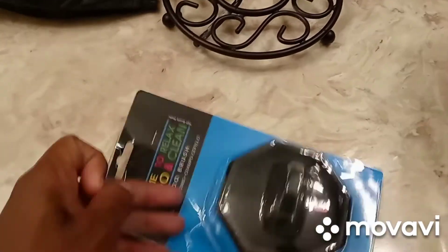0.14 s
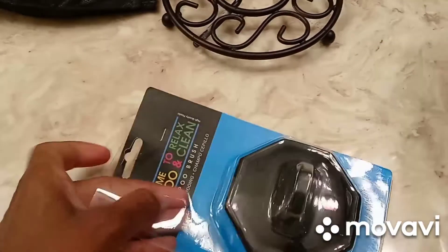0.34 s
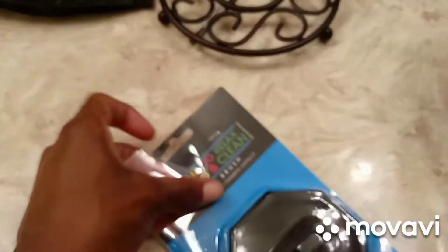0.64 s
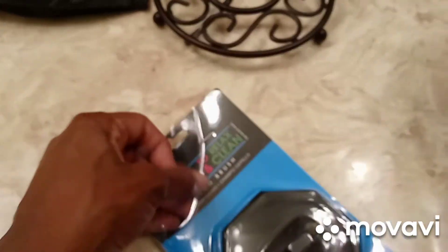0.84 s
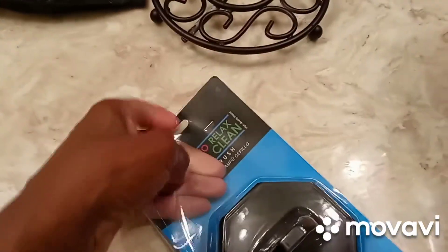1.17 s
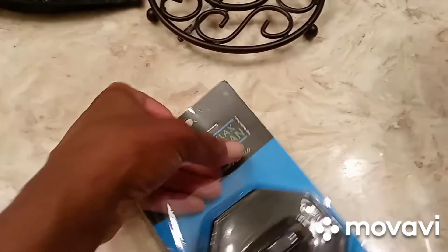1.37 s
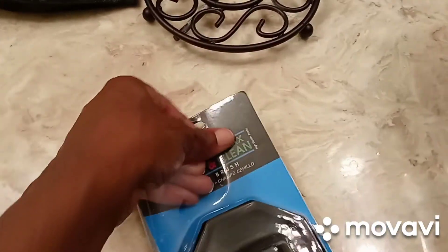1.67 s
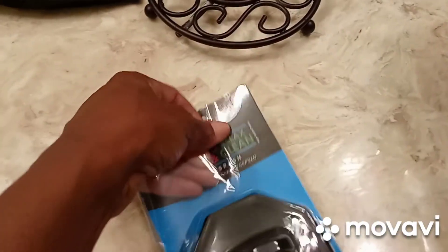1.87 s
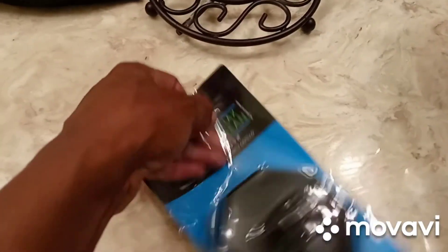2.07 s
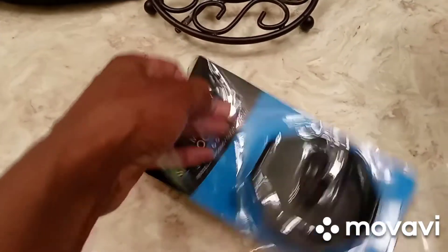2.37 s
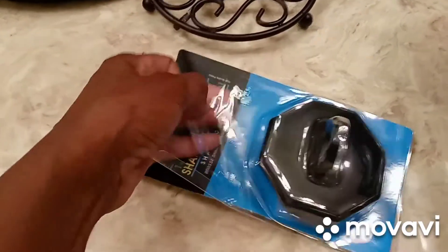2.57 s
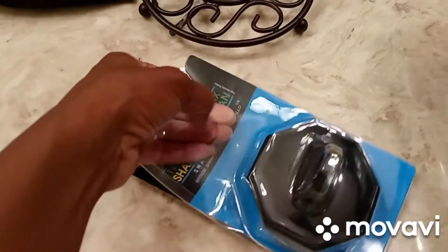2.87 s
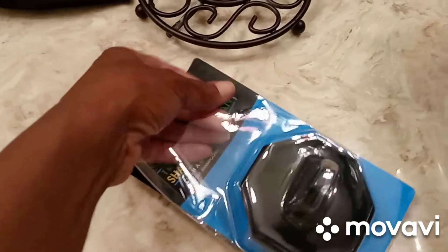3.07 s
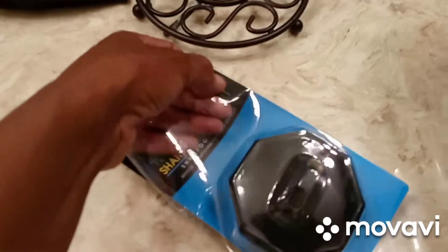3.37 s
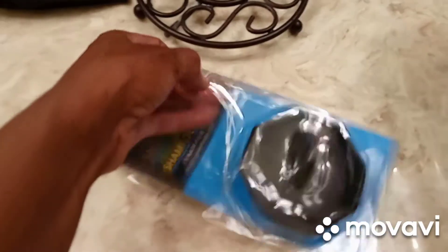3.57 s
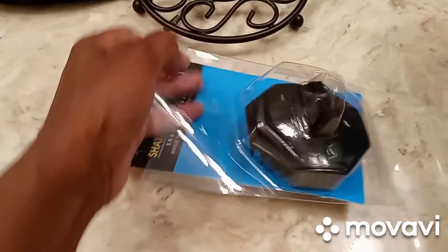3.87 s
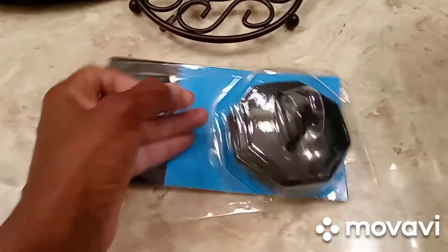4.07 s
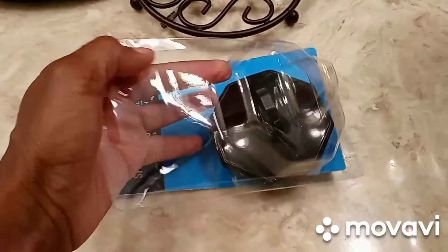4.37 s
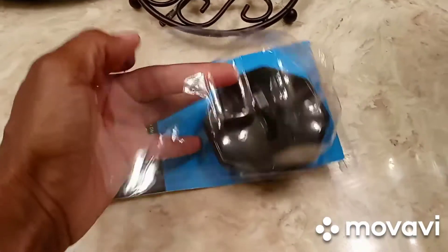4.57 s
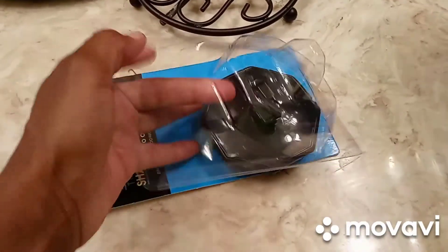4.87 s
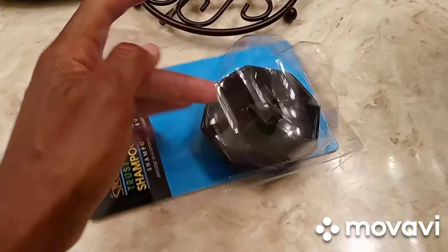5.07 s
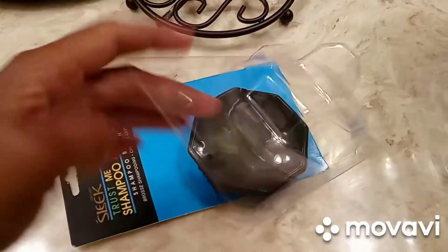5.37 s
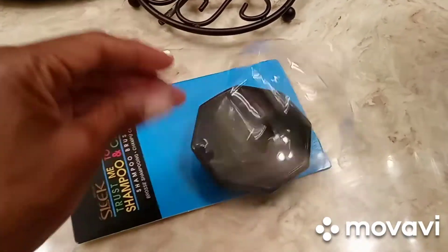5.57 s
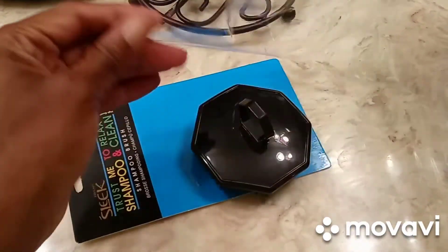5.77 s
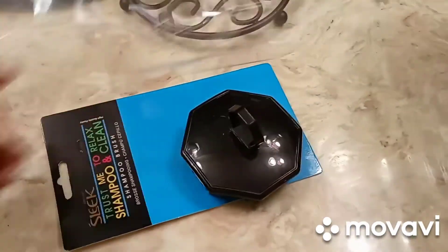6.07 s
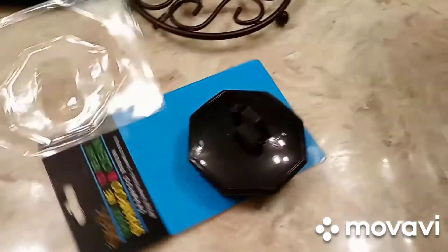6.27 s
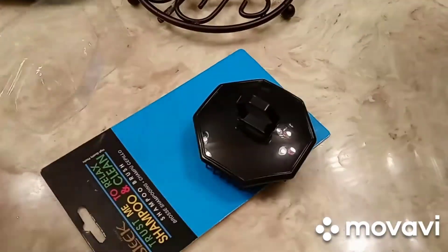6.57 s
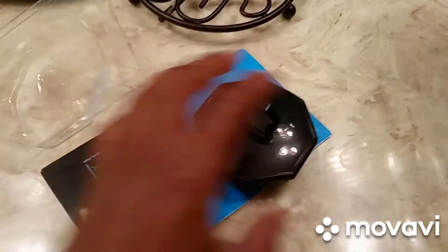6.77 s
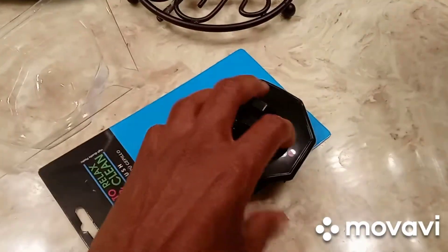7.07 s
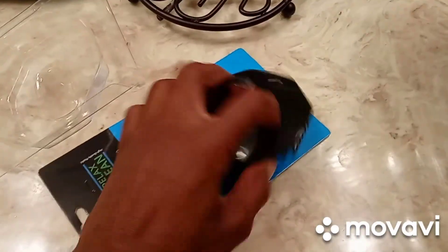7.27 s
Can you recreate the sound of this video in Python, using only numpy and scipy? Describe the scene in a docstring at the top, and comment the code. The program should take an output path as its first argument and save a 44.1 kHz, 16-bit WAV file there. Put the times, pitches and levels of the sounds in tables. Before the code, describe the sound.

From the start, stiff plastic packaging crinkles and snaps close by as a hand pries it from its card backing in a small room. Sharp, uneven cracks and short rubs continue through the first two seconds, with quick runs of ticks as the glued seam gives. At about 2.5 seconds comes the loudest crack, with a dull thump and a brief rip. More snaps follow, and another ticking tear comes at around 3.6 to 3.8 seconds. From 4 seconds the loosened shell crackles with a hollower ring, with a strong snap near 5.5 seconds. The card drops lightly on a stone counter at about 5.8 seconds. The empty shell is set down with light hollow taps near 6.4 seconds, and the card scrapes over the stone in short pushes until about 6.9 seconds. A few faint finger ticks end it just after 7 seconds.

```python
"""A stiff plastic blister is peeled off its card by hand, close by, over a stone counter in a small room.
Creases buckle with a snap, the glue seam fails in runs of ticks, and stick-slip friction sounds the
sheet as it slides and flexes. Once free, the hollow shell rings in its own modes. The card drops on
the counter and scrapes over the stone; the shell is laid aside and fingers touch the packed item."""
import sys
import numpy as np
from scipy import signal
from scipy.fft import rfft, irfft
from scipy.io import wavfile
from scipy.ndimage import uniform_filter1d

SR = 44100
rng = np.random.default_rng(int(sys.argv[2]) if len(sys.argv) > 2 else 0)


def file_out(sig):
    """Save sig as 16-bit WAV at sys.argv[1]."""
    # one column per channel
    cols = np.atleast_2d(sig).T
    # limit, then scale
    lim = np.clip(cols, -1, 1)
    pcm = np.round(lim * 32767).astype(np.int16)
    wavfile.write(sys.argv[1], SR, pcm)


N = 327222
TIME = np.arange(N) / SR

# modes of the hollow shell: pitch_hz, level_db, t60_s
SHELL_MODES = [(308, -28.5, 0.17), (630, -21.5, .3), (857, -6.5, 0.24), (838, -9.5, 0.14),
               (1026, -19.5, .16), (1196, -5, .07), (2360, -10.5, 0.12), (3467, -18.5, .11)]


def undb(db):
    """Decibels to amplitude ratio."""
    return 10 ** (np.asarray(db) / 20)


def unit(x):
    """Normalisation to rms 1."""
    return x / np.sqrt(np.mean(x ** 2))


def unit_energy(x):
    """Normalisation to a sum of squares of 1."""
    return x / np.sqrt(np.sum(x ** 2))


def add(track, s, sound):
    """Superposition: a sound joins the track at time s."""
    start = int(np.clip(s * SR, 0, N - 1))
    track[start:start + len(sound)] += sound[:N - start]


def convolve(x, response):
    """Linear filtering by an impulse response, cut to the length of x."""
    return signal.fftconvolve(x, response)[:len(x)]


def filtered(x, order, hz, kind="bandpass"):
    """Maximally flat filtering with corners at hz."""
    return signal.sosfilt(signal.butter(order, hz, kind, fs=SR, output="sos"), x)


def colour(points, size=1024):
    """Minimum-phase response of a (frequency_hz, level_db) spectrum, by folding its cepstrum."""
    hz, db = np.transpose(points)
    grid = np.maximum(np.fft.rfftfreq(size, 1 / SR), 1)
    magnitude = undb(np.interp(np.log(grid), np.log(hz), db))
    cepstrum = irfft(np.log(magnitude))
    cepstrum[1:size // 2] *= 2
    cepstrum[size // 2 + 1:] = 0
    return irfft(np.exp(rfft(cepstrum)))


def ring(modes):
    """Free vibration: damped modes of a struck object, with the bass below its lowest mode cut away."""
    t = TIME[:SR // 2]
    sound = sum(undb(db) * np.sin(2 * np.pi * hz * t) * np.exp(-np.log(1000) * t / t60)
                for hz, db, t60 in modes)
    return filtered(sound, 3, modes[0][0] * .8, "highpass")


def stick_slip(rate_hz, spread_db, smooth):
    """Stick-slip friction: random impulses of very unequal size over a share of smooth noise."""
    sizes = undb(spread_db * np.minimum(rng.exponential(size=N), 4))
    slips = (rng.random(N) < rate_hz / SR) * sizes * rng.choice([-1, 1], N)
    return unit(unit(slips) + smooth * rng.standard_normal(N))


def swell(start, end, skew=0.71):
    """Amplitude envelope of a hand stroke, building faster than it fades."""
    progress = np.linspace(0, 1, int(max(end - start, .01) * SR))
    return np.abs(np.sin(np.pi * progress ** skew)) ** 0.68


def freedom(s):
    """Coupling to the shell's modes at time s, 0-1: the freer it hangs, the more it rings."""
    # share of body-band energy that enters the ring: time_s, share
    ring_share = [(0, 0.01), (3.9, 0.02), (4.25, 0.2), (4.65, 0.33), (5.45, 0.75), (5.72, 0.4), (5.8, 0.93),
                  (6.35, 0.35), (7.4, 0)]
    return np.clip(np.interp(s, *np.transpose(ring_share)), 0, 1)


def sheet_bands():
    """Impulse response of the thin sheet in five bands: bass, body, presence, treble and air."""
    # the sheet's radiation spectrum: frequency_hz, level_db
    radiation = [(190, -14.5), (320, -9.5), (500, -7), (760, 6), (1100, 7.5), (1700, 1.5), (2200, 8.5),
                 (2800, 13.5), (3500, 10), (4500, 1), (6100, -10.5), (6900, -5.5), (8500, -4),
                 (12000, -5.5), (16000, -15.5)]
    # limits of the bands: edge_hz
    edges = [200, 600, 1800, 5000, 9500, 16000]
    tick = colour(radiation)
    return [unit_energy(filtered(tick, 3, band_hz)) for band_hz in zip(edges, edges[1:])]


def slides(bands, bass_db=-12):
    """Dense stick-slip drives the sheet as it rubs or tears along card and skin."""
    # strokes: start_s, end_s, presence_db, then relative to it body_db, treble_db, air_db
    strokes = [(0, 0.087, -30, -0.5, -6, -10), (0.137, 0.232, -33.5, -4.5, -5, -4),
               (0.54, 0.67, -42, 0.5, -3, 0.5), (.831, 0.897, -35, -14, -3.5, -1),
               (1.025, 1.055, -45, 0, 3, 3), (1.075, 1.11, -43, 0, -16.5, -15.5),
               (1.163, 1.187, -32, -5, -3, 5), (1.282, 1.33, -37.5, -20, 0, 3),
               (1.56, 1.592, -31, -7, -1.5, -2.5), (2.232, 2.323, -30, 0.5, 2.5, -17),
               (2.521, 2.648, -19.5, -4, -7, -16), (2.822, 2.934, -33.5, -1, -5, -3.5),
               (3.154, 3.297, -45.5, -9, -5, -6), (3.503, 3.727, -38, -2.5, -10, -14),
               (3.721, 3.857, -20.5, -2.5, -7, -12), (4.208, 4.244, -37.5, -6.5, -6, -3.5),
               (4.314, 4.365, -30, -2, -2, -4.5), (4.739, 4.81, -33.5, -8, -3, 3.5),
               (4.906, 5.007, -35, -7, -3, -10), (5.129, 5.201, -42, -18.5, -7, -8),
               (5.367, 5.447, -36.5, -8, -8, -5.5), (6.012, 6.256, -60, -34, 0, -1)]
    out, friction = np.zeros(N), stick_slip(rate_hz=1800, spread_db=3.2, smooth=.45)
    voices = [convolve(friction, band) for band in bands]
    for start, end, db, body_db, treble_db, air_db in strokes:
        first, stroke = int(max(start, 0) * SR), swell(start, end)
        gains = undb(db + np.array([body_db + bass_db, body_db, 0, treble_db, air_db]))
        rub = sum(gain * unit(voice[first:first + len(stroke)]) for gain, voice in zip(gains, voices))
        add(out, start, stroke * rub)
    return out


def settling(snapping, level_db=-19.5, lag_s=0.017, decay_s=0.016):
    """Relaxation: the envelope of the crinkle that follows every snap."""
    t = TIME[:SR // 2]
    fade = (1 - np.exp(-t / lag_s)) ** 2 * np.exp(-t / decay_s)
    return undb(level_db) * np.sqrt(np.abs(convolve(snapping ** 2, fade / fade.sum())))


def flexing(bands, snapping):
    """Sparse slips creak in the bent sheet, dense ones hiss under the skin; both revive after a snap."""
    # course of the flexing: time_s, crinkle_db, hiss_db
    flex_levels = [(0, -24, -43), (.25, -45.5, -45), (.5, -46, -55.5), (.82, -56.5, -63), (1.1, -37.5, -43),
                   (1.5, -54, -59), (1.64, -38.5, -49), (1.8, -58, -44.5), (1.9, -39, -56),
                   (2.35, -52, -58.5), (3.33, -54, -54), (3.47, -41.5, -48.5), (4.4, -52.5, -51),
                   (4.6, -56, -62.5), (5.6, -69.5, -55.5), (5.97, -88.5, -73), (6.33, -77.5, -71),
                   (6.6, -45, -54), (6.9, -53.5, -54.5), (7.05, -83, -73.5)]
    s, *columns = np.transpose(flex_levels)
    crinkle, hiss = (undb(np.interp(TIME, s, column)) for column in columns)
    after = settling(snapping)
    creak = stick_slip(rate_hz=200, spread_db=3.2, smooth=.25)
    brush = unit(stick_slip(rate_hz=2500, spread_db=3, smooth=1) + .6 * creak)
    bass, body, presence, treble, air = bands
    low = convolve(creak, undb(-15) * bass + undb(-4) * body + undb(-0.5) * presence)
    high = convolve(brush, undb(-3) * (treble + air))
    return np.hypot(crinkle, after) * low + np.hypot(hiss, undb(-5) * after) * high


def hand(motion, gain_db=-44, rumble_hz=125, follow=0.52):
    """Forced vibration: each tug shakes hand and card with a rumble, less while the shell hangs free."""
    effort = np.sqrt(np.abs(uniform_filter1d(motion ** 2, size=2205, origin=1100)))  # rms over 50 ms
    held = 1 - freedom(TIME)
    rumble = filtered(rng.standard_normal(N), 3, [rumble_hz / 1.6, rumble_hz * 1.5])
    return undb(gain_db) * held * effort ** follow * unit(rumble)


def room(x, early_db=-8, early_decay_s=0.011, late_db=-5, low_t60_s=0.33, high_t60_s=0.35):
    """Early reflections off the counter and a diffuse tail; their pattern shifts as the package moves."""
    # spectrum of the reflections: frequency_hz, level_db
    reflectance = [(50, -17.5), (150, -4), (300, 8), (850, 0), (1700, -2), (2800, -1.5), (6000, -6.5),
                   (9000, -4), (16000, -18.5)]
    t, walls, hop = TIME[:SR * 2 // 5], colour(reflectance), SR // 10
    low_fade, high_fade = (np.exp(-np.log(1000) * t / t60) for t60 in (low_t60_s, high_t60_s))
    out, window = np.zeros(N), signal.get_window("hann", 2 * hop)
    for start in range(0, N, hop):  # a fresh random pattern for each overlapping piece
        near, far = rng.standard_normal((2, len(t))) * (t > .0025)
        early = near * np.exp(-t / early_decay_s)
        late = filtered(far, 2, 4500, "lowpass") * low_fade
        late -= filtered(far, 2, 4500, "highpass") * high_fade
        echoes = undb(early_db) * unit_energy(early) + undb(late_db) * unit_energy(late)
        piece = x[start:start + 2 * hop]
        faded = piece * np.sqrt(window[:len(piece)])
        add(out, start / SR, signal.fftconvolve(faded, convolve(echoes, walls)))
    return out


def room_tone(level_db=-72):
    """Stationary background noise: a faint rumble and hiss."""
    # relative spectral density: frequency_hz, density_db
    spectrum = [(25, -15), (60, -6), (120, 3.5), (250, -8.5), (600, -21.5), (900, -14.5), (1500, -19.5),
                (3000, -17.5), (6000, -23.5), (11000, -10), (16000, -15)]
    return undb(level_db) * unit(convolve(rng.standard_normal(N), colour(spectrum, size=4096)))


def buckle(t, decay, crease_hz=2750, crease_t60_s=.005, focus_s=0.001, rise_s=0.0001, grit_db=4.5):
    """Buckling force: a short snap is one crease flipping at its own pitch, a long one a flutter."""
    flutter, grit = rng.standard_normal((2, len(t)))
    onset = 1 - np.exp(-t / rise_s)
    ragged = flutter * undb(grit_db * grit) * onset * np.exp(-t / max(decay, 1 / SR))
    pitch = crease_hz * np.exp(.07 * np.clip(grit[-1], -2, 2))
    crease = np.sin(2 * np.pi * pitch * t) * onset * np.exp(-np.log(1000) * t / crease_t60_s)
    crease_share = .75 * np.exp(-decay / focus_s)
    return np.sqrt(crease_share) * unit_energy(crease) + np.sqrt(1 - crease_share) * unit_energy(ragged)


def band_gains(s, decay, db, body_db, treble_db, push_s=0.0019, air_db_per_db=-0.2278, even_db=-27):
    """Spectral balance of a snap: a brief push or a free shell radiates little bass."""
    brevity_db = 10 * np.log10(1 + (push_s / decay) ** 4)
    bass_db = body_db - 4 - 20 * np.sqrt(freedom(s)) - brevity_db
    # stronger releases move a larger patch of sheet and have less air
    air_db = treble_db + air_db_per_db * (db - even_db)
    return undb(db + np.array([bass_db, body_db, 0, treble_db, air_db]))


def snaps(bands, glue):
    """Impulsive excitation of sheet and shell: the direct sound, and the spread that feeds the room."""
    # creases buckle and edges tap: time_s, decay_s, presence_db (energy packed into 1 ms),
    # then relative to it body_db, treble_db
    creases = [(.0485, .0013, -23, 5.5, -9), (.096, .0011, -15, -4.5, -16), (.1024, .0013, -18, -20, -15),
               (.1661, 0.0031, -11, -3, -13), (.2589, 0.0041, -16.5, 2.5, 1),
               (.3421, 0.0047, -7.5, -2, -14), (.3544, .0015, -11, -19, -4.5),
               (.4538, 0.0016, -30.5, 8.5, 15), (.6292, 0.0049, -16, 3, -21),
               (.6363, 0.0065, -4.5, -0.5, -8), (1.0018, 0.0058, -23.5, -2.5, -9),
               (1.0745, .005, -20.5, 1.5, -16), (1.1747, 0.0033, -18.5, -3, 0),
               (1.2144, .0066, -21, 1, -13), (1.2856, 0.0019, -23.5, -18, -9),
               (1.3354, 0.0013, -2, -6, -6.5), (1.4498, 0.0029, -17, -13, -6),
               (1.5512, 0.011, -22.5, -42, -7), (1.6012, .001, -24, -1, -8), (1.7002, .0005, -4, -10, -7.5),
               (1.7767, 0.0024, -16, -3.5, -19), (2.0484, 0.0018, -19, -7, -13),
               (2.1206, 0.0072, -18, -2.5, -3), (2.1279, 0.0023, -7.5, -9.5, -6),
               (2.2264, .0014, -2.5, -11, -6.5), (2.234, 0.002, -13, -8, -4),
               (2.278, 0.00095, -6.5, -6, -24), (2.3277, .0013, -17.5, -4.5, -14),
               (2.3591, .002, -19.5, -0.5, -21), (2.3809, 0.0013, -14.5, -7.5, -17),
               (2.4021, .0017, -22, -6.5, -17.5), (2.4509, .009, -24, -1.5, -15.5),
               (2.4658, .0017, -22, -1, -15.5), (2.4821, .0016, -26, -10.5, -24.5),
               (2.5036, 0.0075, -4, 2.5, 0), (2.5075, 0.0052, 2.5, -29, -12),
               (2.514, 0.0067, -0.5, -8.5, -15), (2.7483, .0046, -14, .5, -5),
               (2.8107, 0.0043, -5.5, -8, -4.5), (2.8923, 0.006, -13, -11, -2.5),
               (2.901, .004, -9.5, -2.5, -5.5), (2.9371, 0.0021, -11, -7, -7.5),
               (3.0604, 0.0029, -11.5, -5, -4), (3.183, .005, -26, -6.5, -8), (3.4834, .001, -22, -7, -13),
               (3.5032, 0.0027, -7.5, -3.5, -29), (3.7141, 0.0044, -1.5, -11, -11.5),
               (3.7398, 0.0063, -12, 1.5, 1), (3.859, 0.0048, -14.5, -6, -3),
               (3.9639, 0.0074, -20.5, 1.5, -9), (4.0158, .006, -24.5, -2, -8),
               (4.085, 0.0073, -25.5, -3, -3), (4.1212, 0.0094, -21.5, -2.5, -9),
               (4.2521, .005, -8, 3, -10), (4.3336, 0.0099, -12.5, -2.5, -12), (4.4074, 0.006, -9, -8, -5),
               (4.5605, .012, -26.5, -2.5, -13.5), (4.634, .01, -39.5, 4.5, -11),
               (4.685, 0.0047, -19, -10, -10.5), (4.7397, 0.016, -13.5, 3.5, -9),
               (4.7453, .007, -11.5, 2, -0.5), (4.866, .0014, -31.5, -1, -2),
               (5.0318, 0.0028, -28.5, -5.5, 4), (5.2781, 0.004, -30, -12, 2.5),
               (5.3115, 0.0019, -21, -8, -4), (5.4139, 0.0093, -13, -7.5, -9),
               (5.4618, .0085, -3.5, -3.5, -1), (5.469, .012, -15.5, 12, -22),
               (5.4995, 0.002, -18.5, -17, 0), (5.7025, 0.0042, -24, -2.5, -6),
               (5.7419, 0.0039, -14, -3.5, 2), (6.0869, .0007, -52.5, -22, 15.5),
               (6.3528, 0.0036, -26.5, 2, -13), (6.3685, 0.0039, -32.5, 13.5, -6),
               (6.4105, .009, -30, 10, -7), (6.5151, 0.0014, -24.5, -20, -1),
               (6.5652, .005, -28.5, -16, -2), (6.5894, 0.0048, -20, -25, -0.5),
               (6.7803, 0.0056, -25, -12, -1.5), (6.8384, 0.0096, -23.5, -13, -3),
               (6.8983, 0.0095, -26.5, -9.5, -8.5), (7.089, .007, -48, -15, -6.5),
               (7.181, 0.0034, -51, -16.5, -3), (7.345, .005, -60.5, -15, 2)]
    direct, spread, t = np.zeros(N), np.zeros(N), TIME[:SR // 12]
    hollow = unit_energy(ring(SHELL_MODES))
    for s, decay, db, body_db, treble_db in creases + glue:
        force = buckle(t, decay)
        gains = band_gains(s, decay, db, body_db, treble_db) * np.sqrt(SR / 1000)
        # the freed shell takes over part of the body band and rings with it
        free = freedom(s)
        for track in (direct, spread):
            add(track, s, gains[1] * np.sqrt(free) * hollow)
        gains[1] *= np.sqrt(1 - free)
        crack = sum(gain * unit_energy(convolve(force, band)) for gain, band in zip(gains, bands))
        add(direct, s, crack)
        # over all directions the notches of the flutter partly average out
        clean_tick = sum(gain * band for gain, band in zip(gains, bands))
        add(spread, s, np.sqrt(.62) * crack)
        add(spread, s + decay, np.sqrt(.38) * clean_tick)
    return direct, spread


def card(grip_below_hz=598, bump_hz=90):
    """Impacts excite the loaded card's modes, the low ones weakened by grip; bumps add dull thuds."""
    # modes of the card: pitch_hz, level_db, t60_s
    card_modes = [(241, -26, 0.067), (313, -2, 0.22), (421, -3.5, 0.11), (461, 3, 0.047),
                  (638, -9.5, 0.066), (747, 7.5, 0.029), (945, 9, 0.019), (1151, -17, 0.053)]
    # the card is jerked or lands on the counter: time_s, strength_db, grip_db_per_octave
    knocks = [(0.344, -22, 8), (0.543, -32, 12), (2.75, -22, 3.5), (5.745, -32.5, 0), (5.819, -24, 9),
              (5.828, -28, -1), (5.843, -30, 5)]
    # the glue lets go or the card is pressed down: time_s, level_db, decay_s
    bumps = [(.637, -45, .015), (2.506, -12, 0.0041), (2.748, -41.5, 0.023), (6.85, -53, 0.034)]
    out, t = np.zeros(N), TIME[:SR // 3]
    for s, db, grip in knocks:
        gripped = [(hz, mode_db + grip * min(np.log2(hz / grip_below_hz), 0), t60)
                   for hz, mode_db, t60 in card_modes]
        add(out, s, undb(db) * ring(gripped) / 2)
    for s, db, decay in bumps:
        burst = rng.standard_normal(len(t)) * np.exp(-t / decay)
        thud = filtered(burst, 3, [bump_hz / 2, bump_hz * 2])
        add(out, s, undb(db) * unit_energy(thud) * np.sqrt(decay * SR / 2))
    return out


def glue_ticks(decay_s=.0014, body_db=-5, scatter_db=1.7, jitter_s=.0004):
    """Stepwise fracture: a steady pull opens the seam in nearly even steps, each a row for snaps()."""
    # runs of ticks along the seam: start_s, end_s, gap_s, first_db, last_db, treble_db
    runs = [(1.12, 1.166, .0098, -29, -23.5, -23), (1.9185, 1.975, 0.018, -39, -22, -8),
            (2.072, 2.115, 0.013, -28.5, -24, -10.5), (2.1586, 2.215, 0.01, -12, -12.5, -20),
            (3.583, 3.712, 0.016, -21, -11, -11.5)]
    rows = []
    for start, end, gap, first_db, last_db, treble_db in runs:
        chance = rng.standard_normal((40, 3))
        for s, (late, loud, deep) in zip(np.arange(start, end, gap), chance):
            db = np.interp(s, [start, end], [first_db, last_db]) + scatter_db * loud
            rows.append((s + jitter_s * late, decay_s, db, body_db + scatter_db * deep, treble_db))
    return rows


def shell(rubbing, gain_db=-8):
    """Resonance: rubbing keeps the hollow blister singing as it comes off the card."""
    return undb(gain_db) * convolve(rubbing * freedom(TIME), unit_energy(ring(SHELL_MODES)))


def scrapes():
    """Sliding friction: the card's edge judders over the stone and catches on fine grit."""
    # pushes of the card: start_s, end_s, judder_db, grit_db
    pushes = [(6.364, 6.502, -32, -47), (6.584, 6.675, -32, -40), (6.656, 6.75, -41.5, -40),
              (6.8, 6.913, -40.5, -45)]
    # radiation of the scraping card: frequency_hz, level_db
    card_spectrum = [(70, -42), (170, -11), (660, -14.5), (790, -2), (1100, -6.5), (1290, -14), (1550, 3.5),
                     (1850, -3), (2100, -7.5), (2750, -7), (4000, -22.5), (15000, -56)]
    # ring of a grain under the card: frequency_hz, level_db
    grain_spectrum = [(1500, -32), (3500, -5), (5000, -5), (6500, -17), (9000, -9), (12300, -1.5),
                      (13800, -4), (16000, -22)]
    out, body, grain = np.zeros(N), colour(card_spectrum), unit_energy(colour(grain_spectrum))
    for start, end, judder_db, grit_db in pushes:
        stroke = swell(start, end)
        judder = stick_slip(rate_hz=850, spread_db=6, smooth=0.58)[:len(stroke)]
        grit = stick_slip(rate_hz=90, spread_db=3.5, smooth=0.083)[:len(stroke)]
        scrape = undb(judder_db) * unit(convolve(judder, body)) + undb(grit_db) * convolve(grit, grain)
        add(out, start, stroke * scrape)
    return out


def scene():
    """Direct sound, reverberation and room tone superpose, the same in both channels."""
    bands = sheet_bands()
    direct, spread = snaps(bands, glue_ticks())
    rubbing = slides(bands) + flexing(bands, direct)
    friction = rubbing + shell(rubbing) + scrapes()
    handling = friction + card() + hand(direct + friction)
    mono = direct + handling + room(spread + handling) + room_tone()
    return np.array([mono, mono])


def record(dry, ceiling=0.97, low_cut_hz=30, high_cut_hz=15850):
    """Soft saturation rounds the loudest snaps; band limiting cuts the deepest bass and the top."""
    rounded = dry / (1 + (dry / ceiling) ** 4) ** (1 / 4)
    lean = filtered(rounded, 2, low_cut_hz, "highpass")
    return signal.sosfilt(signal.ellip(10, .2, 80, high_cut_hz, fs=SR, output="sos"), lean)


dry = scene()
out = record(dry)
file_out(out)
```